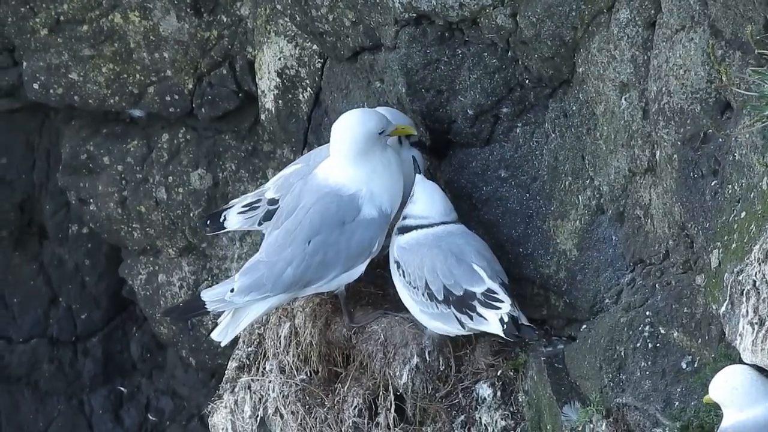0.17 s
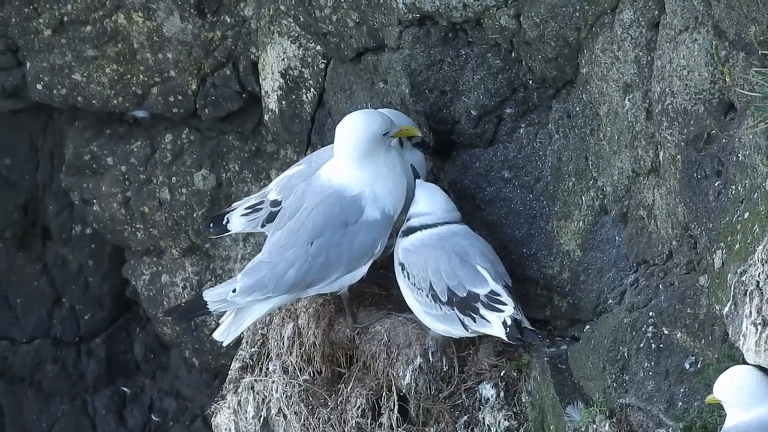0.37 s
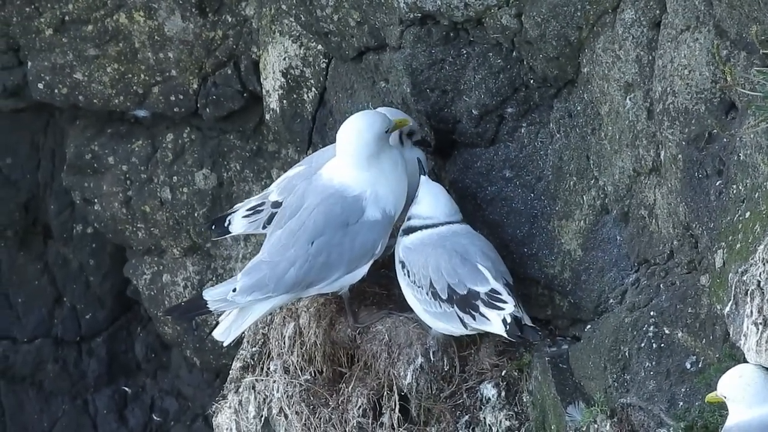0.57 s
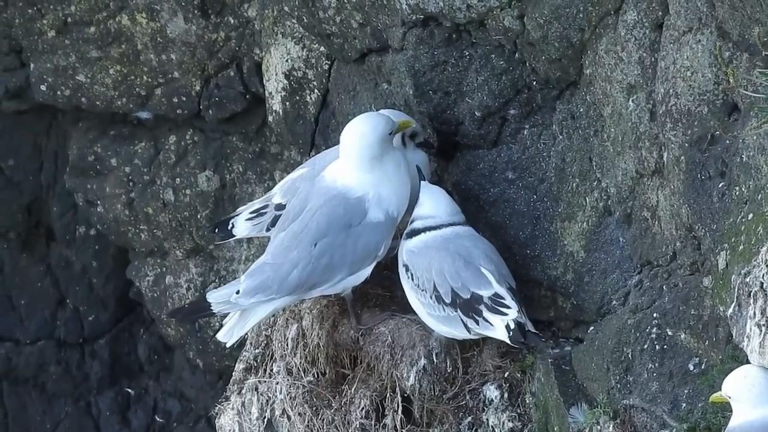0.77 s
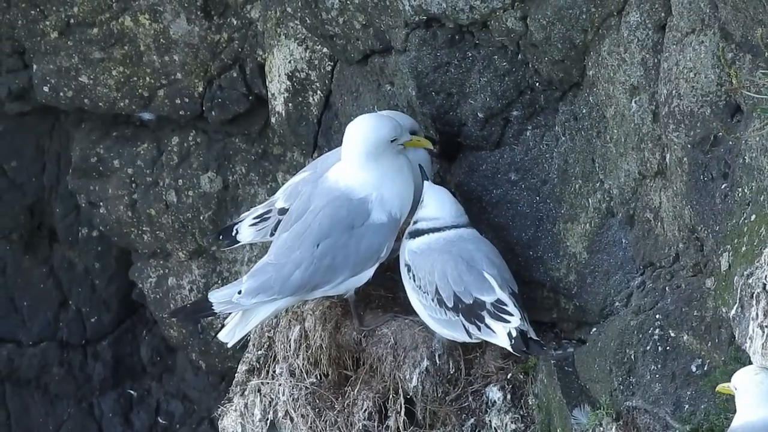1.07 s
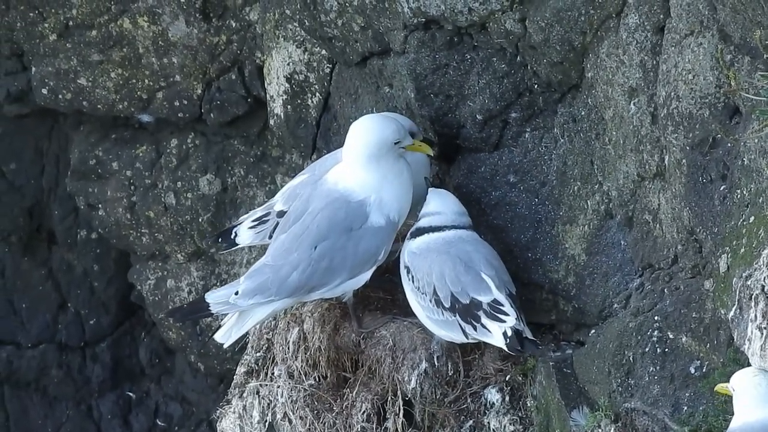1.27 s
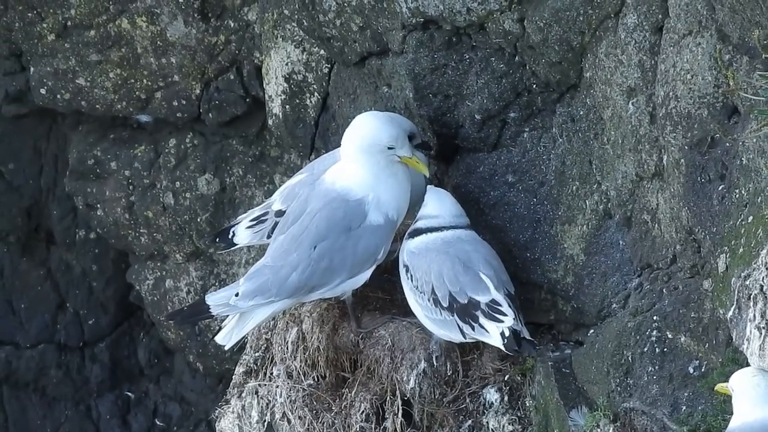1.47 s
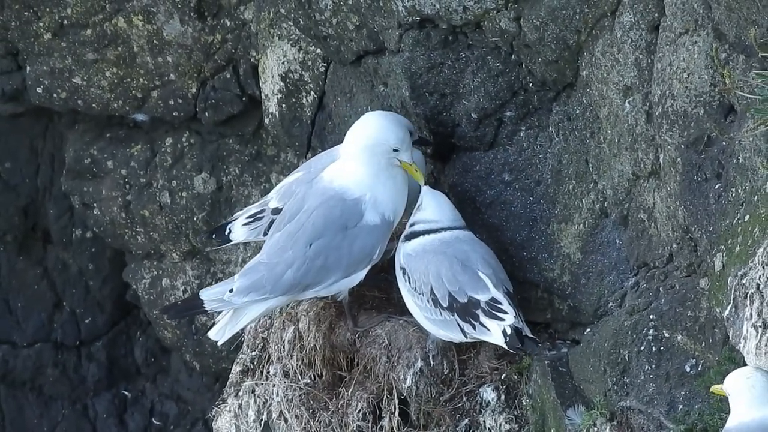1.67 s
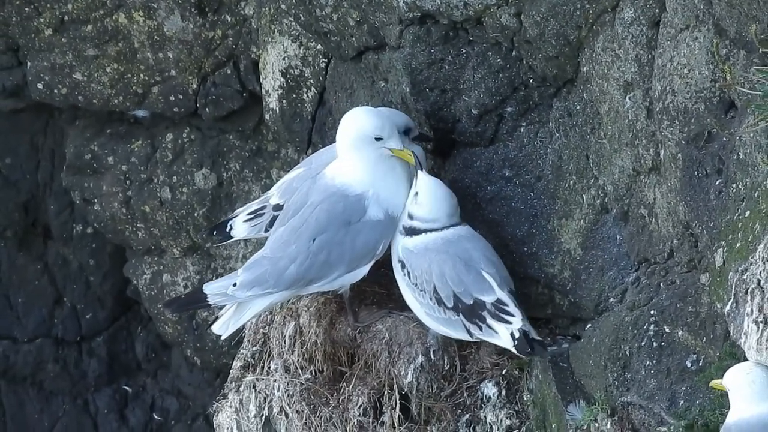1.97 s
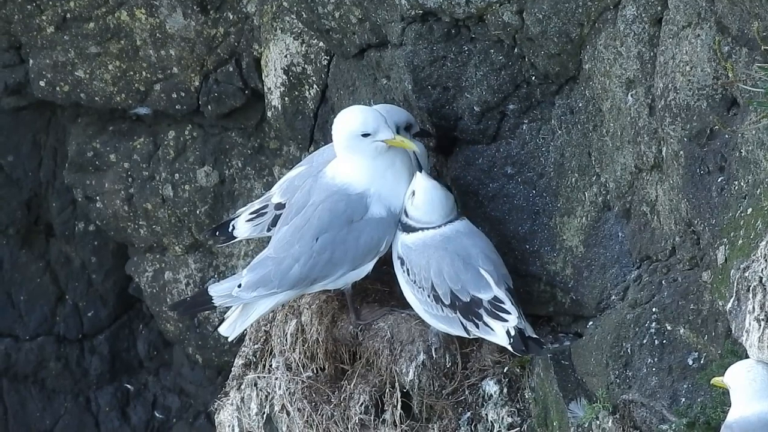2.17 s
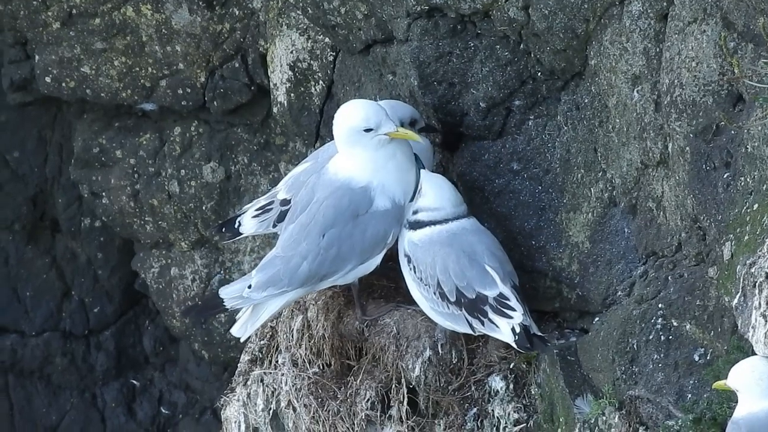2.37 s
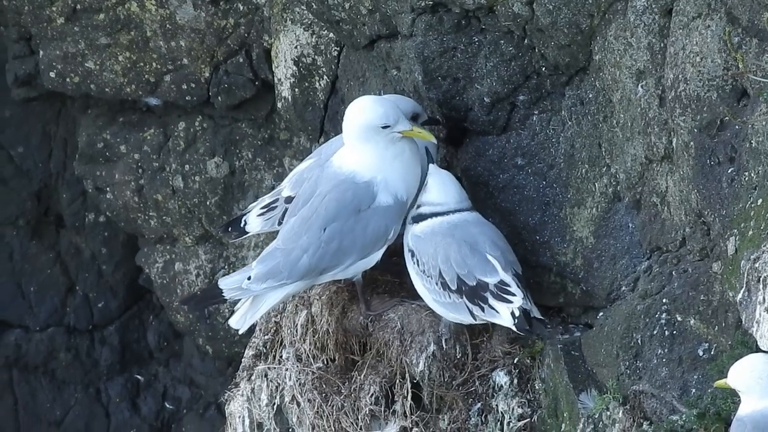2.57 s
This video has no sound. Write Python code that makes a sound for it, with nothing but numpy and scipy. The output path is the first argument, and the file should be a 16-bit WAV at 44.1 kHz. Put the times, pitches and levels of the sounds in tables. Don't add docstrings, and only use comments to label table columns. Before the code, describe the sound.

Seabird calls crowd together: a bending wail first, a loud cry near the middle, a lower answer, then peeps and a falling call, with short rock echo, blurred far birds, surf and soft wind knocks in stereo.

```python
import sys
import numpy as np
from scipy import signal
from scipy.fft import rfft, irfft, next_fast_len
from scipy.io import wavfile
from scipy.ndimage import uniform_filter1d

SR = 44100
rng = np.random.default_rng(int(sys.argv[2]) if len(sys.argv) > 2 else 0)


def pcm_store(signal):
    levels = np.round(np.clip(np.atleast_2d(signal), -1, 1) * 32767)
    wavfile.write(sys.argv[1], SR, levels.astype(np.int16).T)


def volts_from_decibels(level):
    exponent = np.asarray(level, float) / 20
    return 10 ** exponent


N = 119952


def evened(x):
    return x / np.sqrt(np.mean(x ** 2) + 1e-20)


def read(points, hz):
    f, value = np.transpose(points)
    return np.interp(np.log(hz + 1), np.log(f + 1), value)


def over_time(curve):
    return volts_from_decibels(np.interp(np.arange(N) / SR, *np.transpose(curve)))


def add(mix, start_s, sound):
    part = mix[max(round(start_s * SR), 0):][:len(sound)]
    part += sound[:len(part)]


# freq_hz, likeness (0 to 1)
PORT_LIKENESS = [(230, 1), (460, 1), (1800, 0.92), (3500, 0.99), (5000, 0.33), (6500, 0.39)]


def noise(spectrum, patchy_db, same=PORT_LIKENESS, size=1024):
    hz = np.fft.rfftfreq(size, 1 / SR)
    a, b, c, d, patches = rng.standard_normal((4 * N // size + 5, len(hz), 5)).T
    patches = uniform_filter1d(patches, size=8, axis=0)
    patches = evened(uniform_filter1d(patches, size=10, axis=1))
    like = np.clip(read(same, hz), 0, 1)[:, None]
    left = a + 1j * b
    right = like * left + np.sqrt(1 - like ** 2) * (c + 1j * d)
    octaves_past_ends = abs(np.log2(np.clip(hz, spectrum[0][0], spectrum[-1][0]) / (hz + 1)))
    colour_db = read(spectrum, hz) - 11.0 * octaves_past_ends
    z = np.array([left, right]) * volts_from_decibels(colour_db[:, None] + patchy_db * patches)
    return evened(signal.istft(z, nperseg=size, noverlap=3 * size // 4)[1][:, :N])


# freq_hz, level_db (per Hz)
HISS_COLOUR = [(8500, -2.5), (12000, -6), (15500, -9.5)]


def circuit_hiss():
    return volts_from_decibels(-69) * noise(HISS_COLOUR, patchy_db=.6, same=[(100, .2)])


# freq_hz, level_db (per Hz)
WIND_COLOUR = [(30, -36.5), (90, -21), (138, 4), (190, 0.5), (380, -4.5), (560, -46.5)]
# time_s, level_db
GUSTS = [(0, -43.5), (.8, -50), (.93, -43), (1.3, -37.5), (1.72, -37.5), (2.05, -43.5), (2.72, -48.5)]
# time_s, level_db
RUMBLE_SWELL = [(0, -44.5), (.65, -52), (1.2, -67), (1.75, -59), (2.1, -86.5), (2.55, -54.5)]
# time_s, pitch_hz, level_db
KNOCKS = [
    (.925, 136, -33.5),
    (1.277, 147, -30),
    (1.669, 207, -36.5),
    (1.751, 85, -39),
]


def wind():
    apart = [(100, .1), (400, .5)]  # freq_hz, likeness
    rumble_colour = [(30, -19), (45, 5.0), (70, 25.5), (110, 0)]  # freq_hz, level_db
    rumble = over_time(RUMBLE_SWELL) * noise(rumble_colour, patchy_db=4.0, same=apart, size=2048)
    buffeting = over_time(GUSTS) * noise(WIND_COLOUR, patchy_db=3.5, same=apart)
    knocks, t = np.zeros(N), np.arange(-1000, 1000) / SR
    for time_s, pitch_hz, level_db in KNOCKS:
        knock = np.hanning(len(t)) * np.cos(2 * np.pi * pitch_hz * t)
        add(knocks, time_s + t[0], volts_from_decibels(level_db) * knock)
    return buffeting + rumble + knocks


# freq_hz, level_db (per Hz)
SURF_COLOUR = [(250, -9.5), (400, -6.5), (620, -3), (880, -9.5), (1250, -0.5), (1500, -6.5), (1750, -6.5),
               (2300, -31)]
# freq_hz, level_db (per Hz)
FAR_HIGH_COLOUR = [(3700, -12.5), (4200, -9.5), (5000, 3.5), (6200, -0.5), (7500, -21), (8800, -39.5)]


def sea():
    swell = evened(over_time(GUSTS) ** 0.22)
    surf = volts_from_decibels(-37) * swell * noise(SURF_COLOUR, patchy_db=1.83)
    far_high = volts_from_decibels(-42.5) * noise(FAR_HIGH_COLOUR, patchy_db=4.0)
    return surf + far_high


def cliff(x, t60):
    t = np.arange(SR // 2) / SR
    tail = rng.standard_normal((2, len(t))) * volts_from_decibels(-60 * t / t60) * (t > .006)
    tail[1] = 0.59 * tail[0] + .5 * tail[1]
    return signal.fftconvolve(x[None], tail / np.linalg.norm(tail[0]), axes=1)[:, :N]


def glide(start_s, length_s, first_hz, middle_hz, last_hz, level_db):
    return [(start_s, first_hz, level_db),
            (start_s + length_s / 2, middle_hz, level_db),
            (start_s + length_s, last_hz, level_db)]


def slow_drift(count, length):
    drift = rng.standard_normal((count, length))
    return [evened(uniform_filter1d(uniform_filter1d(v, size=300), size=300)) for v in drift]


# freq_hz, level_db
THROAT = [(600, -24.5), (1250, -4.5), (1900, -8), (2700, 2), (3400, -3.5), (4200, -4), (5300, -4.5),
          (8500, -28)]


def voice(rows, orders=None, throat=THROAT):
    s, pitch, db = np.transpose(rows)
    t = np.arange(s[0], s[-1], 1 / SR)
    shake, flutter = slow_drift(2, 16000)
    hz = np.interp(t, s, pitch) * (1 + 0.0033 * shake[:len(t)])
    count = len(orders) if orders else 9000 // pitch.max()
    k = np.arange(1, count + 1)[:, None]
    if orders:
        gain = volts_from_decibels(np.array(orders)[:, None])
    else:
        gain = volts_from_decibels(read(throat, k * hz[len(t) // 2]))
    rate, turn = rng.random((2, 16, 1))[:, :len(k)]
    break_db, bloom_s = 2.0, .025
    breaks = volts_from_decibels(break_db * (k > 2) * np.sin(2 * np.pi * ((7 + 14 * rate) * t + turn)))
    breaks *= np.where(k > 2, np.minimum((t - s[0]) / bloom_s, 1), 1)
    phase = 2 * np.pi * k * np.cumsum(hz) / SR + k ** 2
    tone = (gain / gain.max() * breaks * np.cos(phase)).sum(0)
    edge_s, flutter_db = .009, 1.0
    edge = np.clip(np.minimum(t - s[0], s[-1] - t) / edge_s, 0, 1)
    level = volts_from_decibels(np.interp(t, s, db) + flutter_db * flutter[:len(t)])
    return s[0], np.sqrt(2) * tone * np.sin(edge * np.pi / 2) ** 2 * level


# freq_hz, level_db (per Hz)
FAR_COLOUR = [(1400, -21.5), (1900, -7.5), (2650, -1), (3450, 0.5), (3950, -11), (4900, -6), (6300, -10.5),
              (8800, -43.5)]
# time_s, level_db
CROWD_SWELL = [(0, -29.5), (.45, -28), (.53, -30), (.7, -30), (.87, -32.5), (.95, -29.5), (1.4, -30),
               (1.9, -31), (2.15, -31), (2.72, -31)]


def far_colony():
    mix = np.zeros(N)
    for when, long, high, bend, loud in rng.random((90, 5)):
        start_s, length_s = when * N / SR - .05, .04 + .16 * long
        hz = 600 * 2.1 ** high
        middle_hz, last_hz = hz * (1 + .06 * bend), hz * (.97 + 0.0786 * bend)
        rows = glide(start_s, length_s, hz, middle_hz, last_hz, 6 * loud)
        add(mix, *voice(rows, throat=FAR_COLOUR))
    voices = evened(0.19 * mix + cliff(mix, 0.31))
    blur = noise(FAR_COLOUR, patchy_db=2.0)
    return over_time(CROWD_SWELL) * (volts_from_decibels(-5.5) * voices + volts_from_decibels(-1.0) * blur)


# start_s, length_s, first_hz, last_hz, level_db
HONKS = [
    (0, 0.081, 590, 629, -38),
    (1.055, 0.075, 981, 1045, -39.5),
    (1.16, .19, 605.4, 657, -37),
    (1.172, .08, 900, 896, -30.5),
    (1.7, .085, 914, 860, -38.5),
    (1.84, 0.082, 872, 910, -35.5),
    (1.97, 0.079, 634, 650, -35),
    (2.59, 0.15, 1078, 1076, -46),
    (2.305, 0.07, 1211, 1245, -39.5),
]


def honks(mix):
    for start_s, length_s, first_hz, last_hz, level_db in HONKS:
        middle_hz = (first_hz + last_hz) / 2 * 1.008
        add(mix, *voice(glide(start_s, length_s, first_hz, middle_hz, last_hz, level_db)))


# start_s, length_s, first_hz, last_hz, level_db
PEEPS = [(0, .025, 2380, 2500, -31), (.015, .06, 2540, 2610, -34), (.07, .035, 3340, 3370, -31),
         (.22, .12, 2060, 2106, -39), (.38, .05, 2040, 2020, -36), (.42, .08, 3280, 3400, -35),
         (.652, .03, 2440, 2470, -33), (.755, .035, 2280, 2250, -32), (.89, .07, 2740, 2660, -36),
         (.885, .065, 3450, 3330, -37), (.895, .05, 2034, 2062, -39), (.96, .11, 3250, 3330, -35),
         (1.25, .09, 3320, 3230, -33), (1.41, .04, 3560, 3600, -34), (1.42, .045, 1830, 1842, -38),
         (1.545, .035, 2720, 2700, -32), (1.575, .125, 2850, 2870, -33), (1.87, .05, 1973, 2180, -36),
         (1.9, .045, 2460, 2500, -32), (1.985, .03, 3450, 3400, -31), (2.11, .1, 3350, 3200, -37),
         (2.22, .03, 3350, 3480, -36), (2.222, .022, 2676, 2770, -31), (2.296, .022, 2900, 2830, -33),
         (2.3, .03, 2300, 2450, -36), (2.33, .06, 2520, 2440, -36), (2.358, .026, 2700, 2760, -29.5),
         (2.402, .019, 1996, 2160, -33), (2.456, .13, 3068, 3020, -33), (2.675, .049, 3400, 3500, -36),
         (2.685, .064, 2860, 2800, -31)]
# start_s, length_s, first_hz, last_hz,
# level_db
SQUEAKS = [(.75, .055, 8450, 8500, -56), (.765, .055, 6700, 7200, -48), (.77, .035, 5250, 5200, -37),
           (.835, .045, 5400, 5420, -40), (.962, .07, 6250, 6020, -40), (1.59, .045, 5230, 5150, -39),
           (1.665, .035, 6200, 5850, -41), (1.735, .05, 6350, 6050, -40), (1.78, .045, 5450, 4900, -39),
           (1.885, .025, 5380, 5500, -35), (2.31, .05, 4900, 5050, -36), (2.59, .095, 5100, 5060, -39)]
PEEP = [0, -24]


def peeps_and_squeaks(mix):
    for table, orders in [(PEEPS, PEEP), (SQUEAKS, [0])]:
        for start_s, length_s, first_hz, last_hz, level_db in table:
            middle_hz = (first_hz + last_hz) / 2
            add(mix, *voice(glide(start_s, length_s, first_hz, middle_hz, last_hz, level_db), orders))


# time_s, pitch_hz, level_db
WAIL = [(.168, 1305, -28), (.2, 1253, -23), (.243, 1226, -20.5), (.29, 1275, -24), (.335, 1330, -27),
        (.4, 1251, -22), (.44, 1156, -25), (.488, 1040, -34)]
DRONE = [(.08, 1218, -27), (.125, 1180, -24.5), (.2, 1190, -31), (.3, 1205, -38)]
RISER = [(.912, 1160, -38), (.936, 1163, -30.5), (.97, 1200, -33), (1.0, 1212, -33), (1.042, 1203, -29.5),
         (1.085, 1262, -34), (1.105, 1272, -29), (1.135, 1300, -39)]
SHOUT = [(1.158, 1042, -26.5), (1.19, 1030, -19.5), (1.24, 1036, -23), (1.272, 1040, -28.5)]
SLIDE = [(1.74, 1268, -35), (1.785, 1203, -31), (1.84, 1183, -31), (1.89, 1200, -36)]
ANSWER = [(1.908, 931, -31), (1.96, 945.5, -24.5), (1.995, 966, -25), (2.02, 969, -24.5),
          (2.045, 960, -30.5), (2.068, 940, -26.5)]
FALL = [(2.458, 1330, -33), (2.475, 1320, -29), (2.5, 1280, -34), (2.53, 1200, -35), (2.56, 1172, -33),
        (2.62, 1138, -29.5), (2.73, 1105, -33)]
ARCHED = [(.31, 645, -46), (.355, 670, -35), (.375, 680, -41), (.415, 662, -35), (.47, 645, -45)]
YELP = [(1.512, 600, -40), (1.535, 662, -35), (1.55, 670, -35), (1.585, 660, -41)]
GRUNT = [(.798, 670, -32), (.812, 676, -27.5), (.828, 674, -30)]
SWOOP = [(1.335, 3500, -34), (1.36, 3450, -27), (1.376, 3390, -25.5), (1.396, 3230, -34)]
CHIRP = [(.742, 2540, -35), (.758, 2400, -29), (.772, 2480, -32), (.785, 2440, -28), (.805, 2560, -30)]
PURE = [-41.5, 17.5, -16.5, -5, -22, -36.5]
RISING = [-16, 0, -13, -5, -16, -26]
SHOUTED = [-24, 0, -24, -21, -10, -12, -21, -31]
REEDY = [-14, 0, -8, -6, -6, -32]
OPEN = [-19, 0, -7, -13, -4, -15, -22, -30]
NASAL = [-30, -12, -8, -8, -6, -12, -4, 0, -3, -14, -18]
SHRILL = [-30, -20, -16, -10, -12, -14, -10, 0, -1, -14]
DULL = [-30, -14, -5, 0, -6, -18, -20, -16]


def long_calls(mix):
    calls = [(WAIL, PURE), (DRONE, PURE), (RISER, RISING), (SHOUT, SHOUTED), (SLIDE, REEDY),
             (ANSWER, OPEN), (FALL, PURE), (ARCHED, NASAL), (YELP, SHRILL), (GRUNT, DULL),
             (SWOOP, PEEP), (CHIRP, PEEP)]
    for rows, orders in calls:
        add(mix, *voice(rows, orders))


def near_birds():
    mix = np.zeros(N)
    long_calls(mix)
    honks(mix)
    peeps_and_squeaks(mix)
    return mix + volts_from_decibels(-16) * cliff(mix, t60=.25)


def scene():
    return far_colony() + sea() + wind() + near_birds()


# freq_hz, level_db
PORT_TILT = [(200, -0.4), (3500, -.5), (6000, -3), (9000, -2.5)]
# freq_hz, phase_rad
PORT_LEAD = [(1000, .05), (3600, 0.11), (4500, 1.5), (5300, 0.22), (5900, 0.99), (6250, 2.12), (6900, 1.1),
             (8000, 1.4)]


def two_ports(dry):
    size = next_fast_len(N + 4096)
    hz = np.fft.rfftfreq(size, 1 / SR)
    side = np.array([[.5], [-.5]])
    spectrum = rfft(np.pad(dry, ((0, 0), (0, size - N)), "reflect"))
    spectrum = spectrum * volts_from_decibels(side * read(PORT_TILT, hz)) * np.exp(1j * side * read(PORT_LEAD, hz))
    return irfft(spectrum, size)[:, :N]


def roll_off(x):
    return signal.sosfilt(signal.butter(12, 15720, fs=SR, output="sos"), x)


def record(dry):
    fade = np.minimum(np.arange(N)[::-1] / 100, 1)
    mix = (two_ports(dry) + circuit_hiss()) * fade
    return roll_off(mix)


dry = scene()
out = record(dry)
pcm_store(out)
```